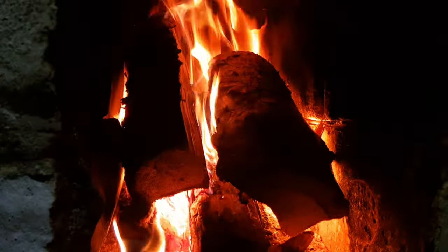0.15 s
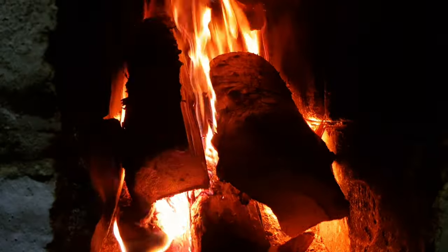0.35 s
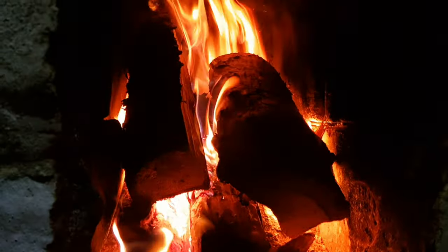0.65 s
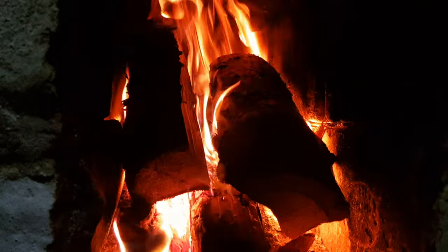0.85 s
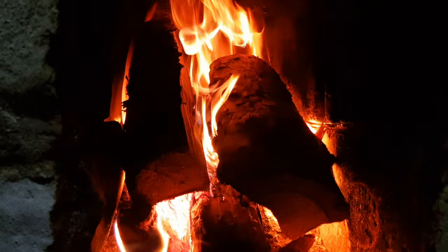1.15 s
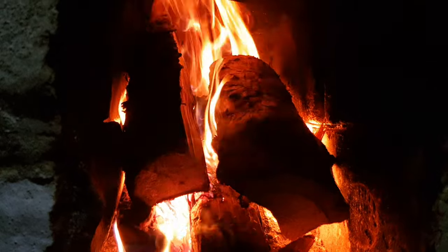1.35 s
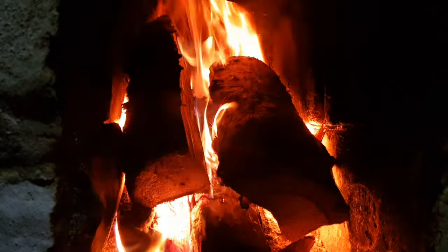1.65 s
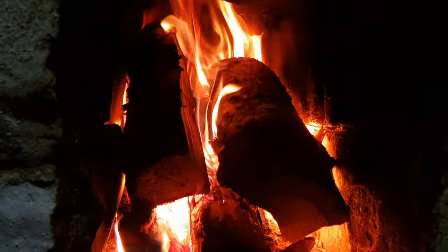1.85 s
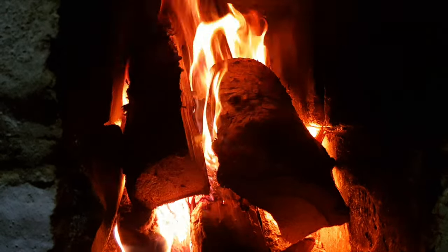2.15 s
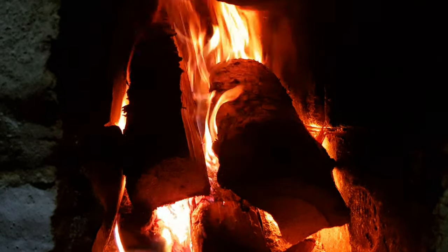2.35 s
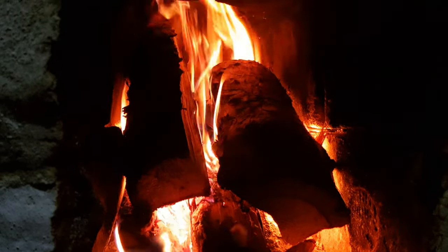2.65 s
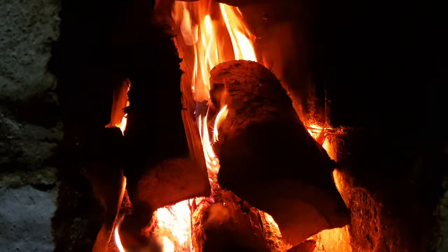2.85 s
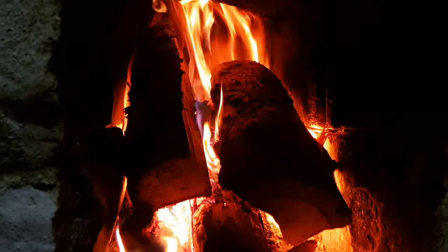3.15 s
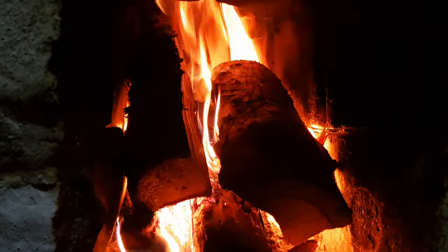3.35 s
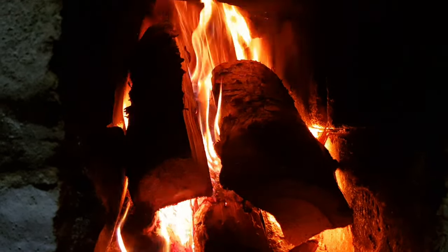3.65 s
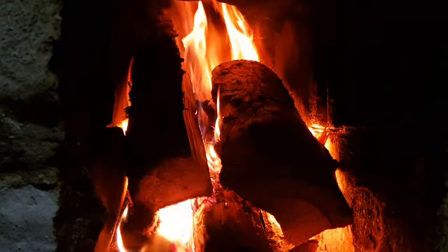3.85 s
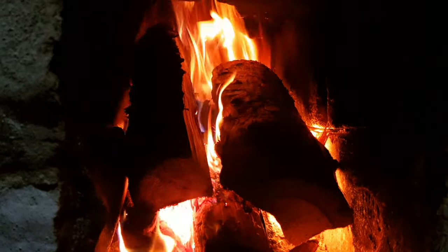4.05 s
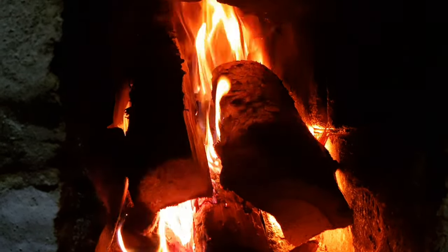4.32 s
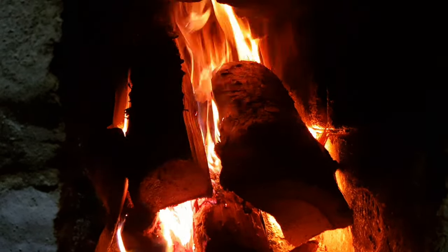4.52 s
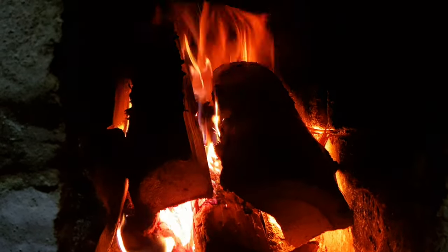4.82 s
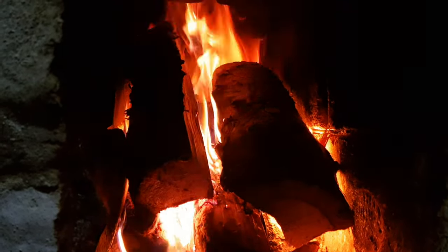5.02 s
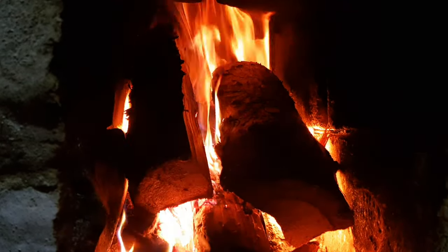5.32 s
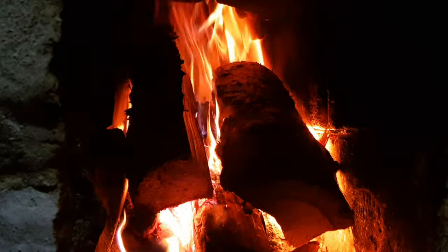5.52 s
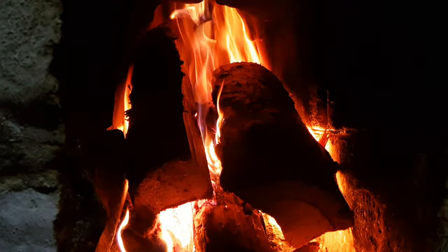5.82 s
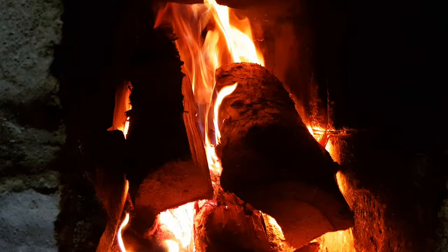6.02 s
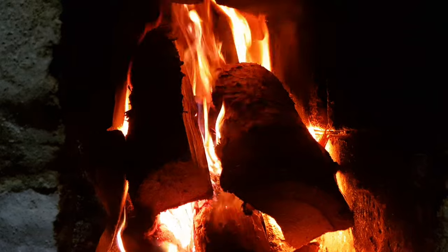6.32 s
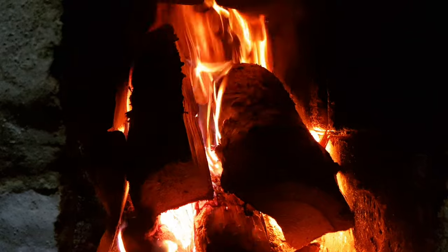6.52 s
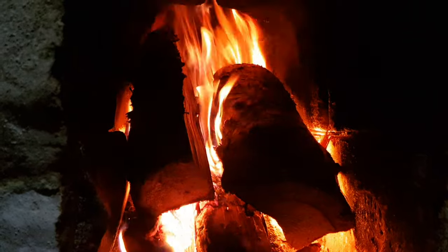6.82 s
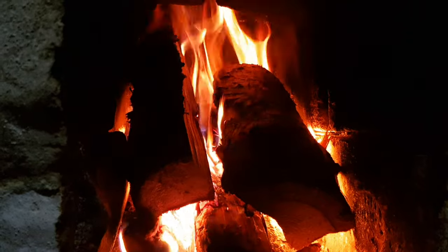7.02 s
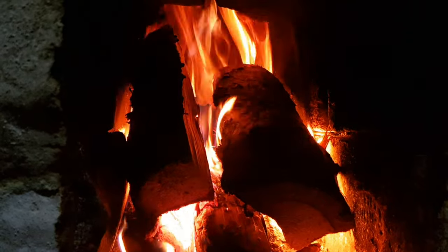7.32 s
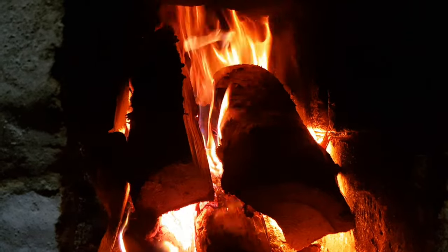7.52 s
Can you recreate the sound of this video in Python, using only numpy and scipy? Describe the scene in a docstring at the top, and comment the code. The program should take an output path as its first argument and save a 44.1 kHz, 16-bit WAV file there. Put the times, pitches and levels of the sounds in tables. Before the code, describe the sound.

Close log fire in a stove: low fluttering flame rumble, thin hiss, bright dry crackles, and two sharp booming wood snaps at 2.2 and 4.6 seconds.

```python
"""Log fire in an open stove

Split logs burn in a firebox, with a stereo microphone close to the stove's mouth.
Shaped noise gives a thin steady hiss and the rumble and flutter of flames that follow the draught.
Gas pockets flare as fading noise; splitting logs crack and set the air of the box booming.
Nearest the ear, charring wood ticks and crackles: short bursts coloured by flake and firebox."""
import sys
import numpy as np
from scipy import signal
from scipy.fft import rfft, irfft, next_fast_len
from scipy.io import wavfile
from scipy.ndimage import uniform_filter1d, map_coordinates

SR = 44100
rng = np.random.default_rng(int(sys.argv[2]) if len(sys.argv) > 2 else 0)


def dump(signal):
    """Clip the signal to [-1, 1] and save it as 16-bit WAV at the path in sys.argv[1]."""
    limited = np.clip(np.atleast_2d(signal).T, -1, 1)
    pcm = np.round(limited * 32767).astype(np.int16)
    wavfile.write(sys.argv[1], SR, pcm)


N = 338247  # length in samples
BASS_CUT_HZ, TOP_HZ = 27, 16000  # band limits of the microphone
PORT_LAG_S = 0.00013  # lag of the side-reversed noise at the right port


def amp(db):
    """Decibels to gain."""
    return 10 ** (np.asarray(db) / 20)


def unit(x):
    """Scale x to rms 1."""
    return x / np.sqrt(np.mean(x ** 2) + 1e-20)


def unit_energy(x):
    """Scale each channel of a burst to energy 1."""
    return x / np.linalg.norm(x, axis=1, keepdims=True)


def fade(t, t60):
    """Exponential decay that loses 60 dB in t60 seconds."""
    return np.exp(-np.log(1000) * t / np.maximum(t60, 1e-4))


def along(points, hz):
    """Interpolate (Hz, value) points on a log frequency axis."""
    f, v = np.transpose(points)
    return np.interp(np.log(hz + 1), np.log(f + 1), v)


def curves(rows):
    """One value per sample for each column after the time."""
    s, *cols = np.transpose(rows)
    return [np.interp(np.arange(N) / SR, s, c) for c in cols]


def wobble(rate):
    """A smooth random curve with rate knots a second."""
    knots = rng.standard_normal(int(N * rate / SR) + 4)
    return map_coordinates(knots, [np.arange(N) * rate / SR])


def sides(db):
    """Left and right gains for a left minus right level difference."""
    return amp(np.array([[.5], [-.5]]) * db)


def filtered(x, gain):
    """Multiply the spectrum of x by gain(Hz)."""
    size = x.shape[-1]
    m = next_fast_len(size + 8192)
    return irfft(rfft(x, m) * gain(np.fft.rfftfreq(m, 1 / SR)), m)[..., :size]


def struck(x, level, size=2048):
    """Pass x through a causal, minimum-phase filter whose dB follow level(Hz)."""
    hz = np.fft.rfftfreq(size, 1 / SR)
    cepstrum = irfft(np.log(amp(level(hz)) + 1e-6))
    # Folding the cepstrum onto positive time makes the filter causal.
    cepstrum[1:size // 2] *= 2
    cepstrum[size // 2 + 1:] = 0
    response = irfft(np.exp(rfft(cepstrum)))
    return signal.fftconvolve(x, response[None], axes=1)[:, :x.shape[1]]


def whitened(x, size=2048):
    """Even out a short burst's spectrum, so that only the wood and the box colour it."""
    power = np.mean(np.abs(rfft(x, size)) ** 2, axis=0)
    power = uniform_filter1d(power, size=15)
    return struck(x, lambda hz: -10 * np.log10(np.abs(power) + 1e-9))


def bump(hz, centre_hz, octaves):
    """A resonance of height 1 on a log axis."""
    return 1 / (1 + (np.log2((hz + 1) / centre_hz) / octaves) ** 2)


def add(out, s, x):
    """Mix x into out at time s."""
    part = out[:, max(round(s * SR), 0):][:, :x.shape[1]]
    part += x[:, :part.shape[1]]


# How alike the sound is at the two microphone ports: pitch_hz, likeness (1 = identical).
PORT_LIKENESS = [(60, 0.98), (150, 1), (300, 0.95), (640, 0.73), (1400, 1), (3000, 0.14), (7000, 0.52),
                 (15000, 0.32)]


def noise(size, spectrum=None):
    """Stereo noise of rms 1: the bass is alike at both ports, the treble much less."""
    m = next_fast_len(size)
    hz = np.fft.rfftfreq(m, 1 / SR)
    turn = np.arccos(np.clip(along(PORT_LIKENESS, hz), -1, 1)) / 2
    colour = 1 if spectrum is None else amp(along(spectrum, hz))
    shares = np.array([np.cos(turn), np.sin(turn)])
    mid, side = rfft(rng.standard_normal((2, m))) * colour * shares
    lag = np.exp(-2j * np.pi * hz * PORT_LAG_S)
    stereo = irfft(np.array([mid + side, (mid - side) * lag]), m)
    return unit(stereo[:, :size])


# How hard the fire draws, only departures from the mean counting; it slackens after
# the last big snap: start_s, level_db.
DRAUGHT_LEVEL = [(0.0, -45.5), (2.11, -46), (2.37, -45.5), (2.67, -48), (3.48, -47), (4.08, -44),
                 (4.27, -46), (4.61, -46.5), (4.85, -51), (5.23, -51), (5.64, -51.5), (6.51, -50.5),
                 (6.79, -50.5), (7.67, -47)]


def draught():
    """The draught in dB above its average, one value per sample."""
    level_db, = curves(DRAUGHT_LEVEL)
    return level_db - level_db.mean()


# Colour of the hiss, relative: pitch_hz, level_db per Hz.
HISS_COLOUR = [(500, -7), (1300, -9), (1900, -5.5), (2600, -7), (3600, -4), (4600, 6), (5500, -0.5),
               (7000, -1), (8300, -9), (10300, 4), (12000, 2.5), (14200, 6), (15800, 0.5)]
# Where the hiss leans: pitch_hz, left_minus_right_db.
HISS_LEAN = [(1300, -2.5), (4400, 3), (8100, -0.5), (15000, 9.5)]
STEAM_DB, STEAM_GROWS = -57.5, 0.46  # level at the average draught; dB gained per dB of draught


def hiss():
    """A thin hiss, as of sap steaming out of a log on the left; it eases a little with the draught."""
    steam = noise(N, HISS_COLOUR)
    steam = unit(filtered(steam, lambda hz: sides(along(HISS_LEAN, hz))))
    level_db = STEAM_DB + STEAM_GROWS * draught() + 0.31 * wobble(7.6)
    return amp(level_db) * steam


# Colour of the deep flame rumble, relative: pitch_hz, level_db per Hz.
RUMBLE_COLOUR = [(20, -21), (30, -15.5), (42, -7.5), (58, 2.5), (80, 2), (105, -4), (135, -6.5), (168, -2),
                 (200, -13.5), (235, -20), (400, -59.5)]
# Colour of the flutter above it, relative: pitch_hz, level_db per Hz.
FLUTTER_COLOUR = [(150, -16.5), (230, -10.5), (265, 1), (300, -1), (370, -1.5), (480, -8.5), (620, -21.5),
                  (800, -22.5), (1000, -24), (1400, -51), (3000, -49.5)]
RUMBLE_DB, FLUTTER_DB = -43.5, -64.5  # levels at the average draught
FLUTTER_GROWS = 0.93  # dB gained per dB of draught


def flames():
    """Turbulent burning: a deep rumble and a flutter above it follow the draught and surge together."""
    draught_db, surge = draught(), wobble(17)
    rumble_db = RUMBLE_DB + draught_db + 2.2 * surge
    flutter_db = FLUTTER_DB + FLUTTER_GROWS * draught_db + 2.44 * surge + 2.0 * wobble(30)
    rumble = amp(rumble_db) * noise(N, RUMBLE_COLOUR)
    flutter = amp(flutter_db) * noise(N, FLUTTER_COLOUR)
    return (rumble + flutter) * sides(-.6)


# Gas pockets flaring, levels before the envelopes:
# start_s, jet_level_db, flame_level_db, t60_s (base decay, scaled for each part).
GAS_POCKETS = [(2.824, -69.5, -53.5, 0.21), (3.848, -48, -44.5, 1), (5.641, -77, -55, 0.23)]
# Colour of the escaping jet, relative: pitch_hz, level_db per Hz.
JET_COLOUR = [(300, -12), (1000, -66), (1500, 3.5), (2300, 1), (3300, 1.5), (5000, 5), (8300, -12.5),
              (11000, 4), (14500, 0)]
# Colour of the catching flame, relative: pitch_hz, level_db per Hz.
WHOOSH_COLOUR = [(40, -19.5), (80, 10), (170, 8.5), (250, -3), (400, -5), (650, -11.5), (1080, -12),
                 (1400, -36.5), (4000, -45)]
LIGHT_S = 0.057  # time to catch
PUFF_DB, PUFF_SHARE = 5, 0.28  # first puff: relative level, life over the base t60
BURN_DB, BURN_SHARE = -0.5, 1.35  # slow burning out: relative level, life over the base t60


def flares():
    """A gas pocket opens with a short jet and catches fire with a soft, uneven whoosh."""
    out, t = np.zeros((2, N)), np.arange(SR) / SR
    for s, jet_db, flame_db, t60 in GAS_POCKETS:
        jet = amp(jet_db + 1.3 * wobble(90)[:SR]) * noise(SR, JET_COLOUR)
        jet *= fade(t, 0.72 * t60)
        puff = amp(PUFF_DB) * fade(t, PUFF_SHARE * t60)
        burn = amp(BURN_DB) * fade(t, BURN_SHARE * t60)
        whoosh = amp(flame_db + 2.0 * wobble(50)[:SR]) * noise(SR, WHOOSH_COLOUR)
        whoosh *= (puff + burn) * (1 - fade(t, LIGHT_S))
        add(out, s, jet + whoosh)
    return out


# Echoes between the firebox walls: pitch_hz, t60_s.
WALL_ECHOES = [(300, 0.17), (1000, 0.079), (2500, 0.0822), (5500, 0.0627), (9000, .035), (15000, 0.09)]


def fracture(size, tear_t60, tear_db, straight, walls_db, room_db, room_t60):
    """One release of stress: a pulse, tearing fibres, the firebox walls, then the room."""
    t = np.arange(size) / SR
    fibres = noise(size) + straight * rng.standard_normal(size)  # a part reaches both ports alike
    tear = amp(tear_db) * unit_energy(fibres * fade(t, tear_t60))
    tear[[0, 1], [0, 2]] += 1  # the pulse reaches the left port two samples before the right
    direct = unit_energy(whitened(tear))
    hz, frame, z = signal.stft(noise(size), SR, nperseg=128)
    decay = fade(frame, along(WALL_ECHOES, hz)[:, None])
    walls = signal.istft(z * decay, SR, nperseg=128)[1][:, :size]
    room = noise(size) * fade(t, room_t60)
    arrival = 1 - fade(t, 0.0066)  # echoes build up after the direct sound
    walls = amp(walls_db) * unit_energy(walls * arrival)
    room = amp(room_db) * unit_energy(room * arrival)
    return unit_energy(direct + walls + room)


# Logs splitting; levels are relative weights, the pan acts fully only in the treble:
# start_s, crack_db, boom_db, knock_db, treble_db, splinter_pitch_hz, splinter_db, walls_db,
# left_minus_right_db.
LOG_SPLITS = [(0.013, -28, -51, -35.5, -20.5, 3660, 19, -11.5, 2),
              (2.2459, -14, -12.5, -10, -19.5, 2670, 5.5, -11, 3),
              (2.8224, -59, -57, -42, -58, 4500, -3, -15, 25.5),
              (4.6181, -10, -15, -6, -14.5, 5400, 6.5, -11, 2.5)]
# Colour of a split inside the box, relative: pitch_hz, level_db.
SPLIT_COLOUR = [(30, -39.5), (100, -13), (210, 10), (280, -2), (400, 4.5), (540, 3.5), (740, -13.5),
                (980, 0), (1550, -8.5), (1920, 2), (3200, -3.5), (6800, -6), (8300, -13.5), (11000, -2),
                (15000, -10.5)]
# Air modes of the firebox: pitch_hz, level_db (relative), t60_s.
BOX_MODES = [(60.43, -9, 0.23), (86.1, -1, 0.15), (120, -8, 0.11), (163, -2.5, 0.12), (202, -11.5, .08),
             (380, -17, 0.068), (493.3, -18, .085), (576, -21, 0.066)]
PUFF_S = 0.011  # time from the crack to the peak of the gas puff


def snaps():
    """A log splits with a sharp crack, and the released gas thumps the air of the box."""
    out, t = np.zeros((2, N)), np.arange(SR // 2) / SR
    ring = sum(amp(db) * np.cos(2 * np.pi * hz * (t - PUFF_S)) * fade(t, t60)
               for hz, db, t60 in BOX_MODES)
    boom = ring * np.minimum(t / PUFF_S, 1)  # the air modes build while the gas pushes
    for (s, crack_db, boom_db, knock_db, treble_db,
         splinter_hz, splinter_db, walls_db, pan_db) in LOG_SPLITS:
        blow = fracture(len(t), tear_t60=0.011, tear_db=14.0, straight=0.89,
                        walls_db=walls_db, room_db=-29, room_t60=0.33)
        weight = [(600, knock_db), (1900, crack_db), (5500, crack_db), (10000, treble_db)]
        crack = struck(blow, lambda hz: 24 + along(SPLIT_COLOUR, hz) + along(weight, hz)
                       + splinter_db * bump(hz, splinter_hz, 0.35))
        # Only short waves are shaded from one side.
        crack = filtered(crack, lambda hz: sides(pan_db * hz / (hz + 1200)))
        add(out, s, crack + amp(boom_db) * boom)
    return out


# Colour of a crackle, relative: pitch_hz, level_db.
TICK_COLOUR = [(300, -27), (1500, -29.5), (2800, -18.5), (4000, -10.5), (6500, -5.5), (8400, -11.5),
               (10800, -2.5), (14500, -4.5), (16500, -6)]


def crackle(db, pitch_hz, pan_db, low_db):
    """A flake of char breaks off: a very short, bright tick, each with its own uneven colour."""
    blow = fracture(size=4096, tear_t60=0.0073, tear_db=7.5, straight=.4,
                    walls_db=-13, room_db=-24.5, room_t60=.2)
    tilt = [(5000, low_db), (10000, 0)]
    flake = np.column_stack([np.linspace(1000, TOP_HZ, num=20), rng.standard_normal(20)])
    tick = struck(blow, lambda hz: along(TICK_COLOUR, hz) + along(tilt, hz)
                  + 1.5 * along(flake, hz) + 7 * bump(hz, pitch_hz, .09))
    return amp(db) * sides(pan_db) * tick / np.linalg.norm(tick[0] + tick[1])


# The loud crackles: start_s, level_db (energy of both ports summed, before panning), pitch_hz,
# left_minus_right_db, low_lift_db (full below 5 kHz, none above 10 kHz).
LOUD_CRACKLES = [(0.1557, -23.5, 10600, 7, 4), (0.5995, -23.5, 13300, 7, -1), (0.827, -21.5, 10500, 8, -8),
                 (0.936, -16, 13400, -5, -7), (0.9456, -9, 11000, 1, -7.5), (0.9915, -16.5, 10900, -1, -6),
                 (1.7395, -10, 13300, 2, -1), (1.7472, -15, 14000, -1, -4), (2.2178, -16.5, 10200, 4, -7),
                 (2.2752, -6, 14400, 7, 3.5), (3.3738, -24, 14200, 5, -16), (3.504, -13, 15100, 2, -14),
                 (3.8192, -22.5, 14400, 7, 4), (3.8476, -10.5, 14200, 4, -3), (4.4553, -17, 15500, 6, -9),
                 (5.1434, -10.5, 12900, -3, -14.5), (5.3023, -23.5, 12700, 3, -8),
                 (5.4873, -12.5, 10700, -2, -8.5), (5.5315, -5, 12750, -2.5, -13),
                 (6.318, -6.5, 11710, -1.5, -3.5), (6.4447, -23.5, 12400, -2.5, -17),
                 (6.895, -13.5, 12100, -.5, -4), (7.3526, -22, 13260, 4.5, -6.5),
                 (7.359, -22, 5070, 3.5, 28), (7.5567, -26.5, 13850, 7, 2),
                 (7.6152, -13.5, 14500, -1, -3.5)]
FAINT_DB, FAINT_SPREAD_DB = -39, 10  # weakest random crackle; how far the strongest can exceed it
FAINT_HZ, FAINT_SPAN = 6000, 2.5  # lowest pitch; ratio of the highest to the lowest
FAINT_PAN_DB, FAINT_LOW_DB = 6, -2.5  # furthest left minus right; lift of the lower half


def crackles(count=60):
    """Loud crackles at set times, and faint ones at random: most are weak, a few stand out."""
    out = np.zeros((2, N))
    for s, db, pitch_hz, pan_db, low_db in LOUD_CRACKLES:
        add(out, s, crackle(db, pitch_hz, pan_db, low_db))
    for when, strength, pitch, place in rng.random((count, 4)):
        db = FAINT_DB + FAINT_SPREAD_DB * strength ** 2
        pitch_hz = FAINT_HZ * FAINT_SPAN ** pitch
        add(out, when * N / SR, crackle(db, pitch_hz, FAINT_PAN_DB * place, FAINT_LOW_DB))
    return out


def scene():
    """Everything the fire does, heard from the stove's mouth."""
    return hiss() + flames() + flares() + snaps() + crackles()


def record(dry):
    """The microphone thins the deepest bass and cuts off steeply above its band limit."""
    def response(hz):
        bass_cut = (1j * hz / (1j * hz + BASS_CUT_HZ)) ** 3
        return bass_cut / (1 + (hz / TOP_HZ) ** 160)
    return filtered(dry, response)


dry = scene()
out = record(dry)
dump(out)
```